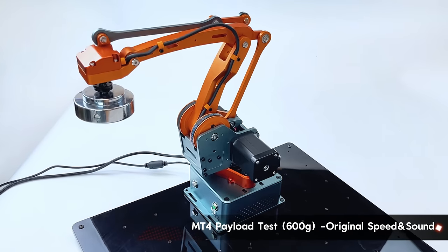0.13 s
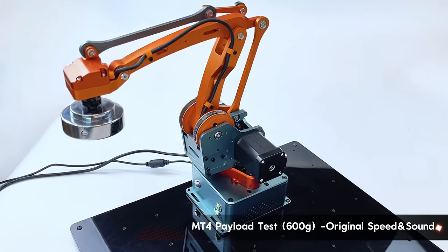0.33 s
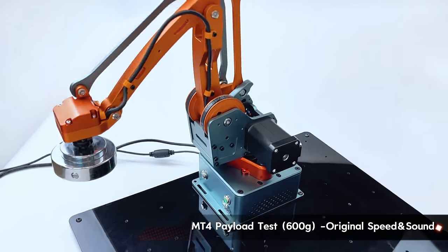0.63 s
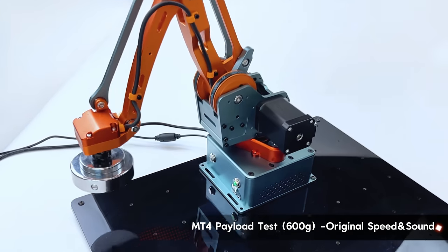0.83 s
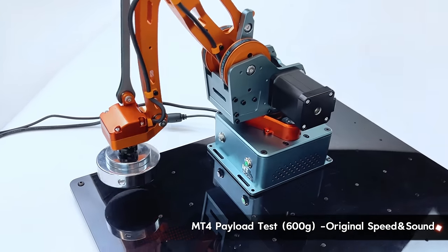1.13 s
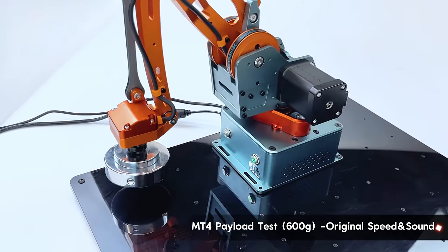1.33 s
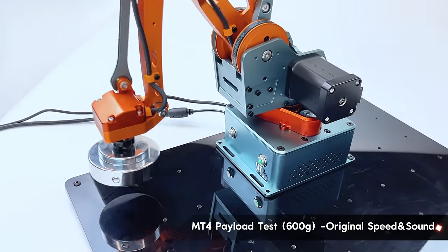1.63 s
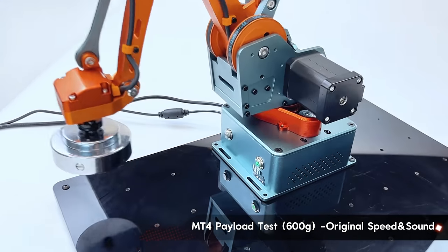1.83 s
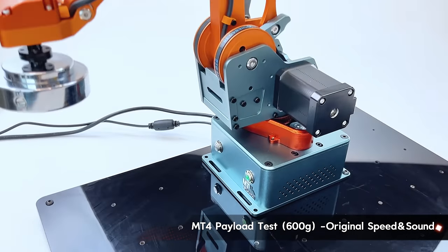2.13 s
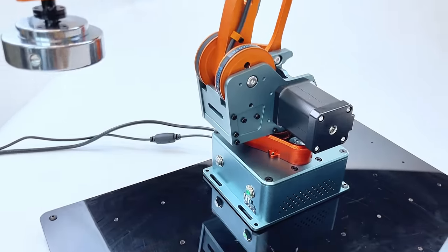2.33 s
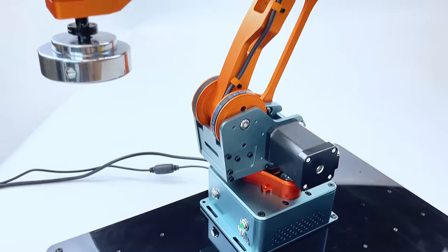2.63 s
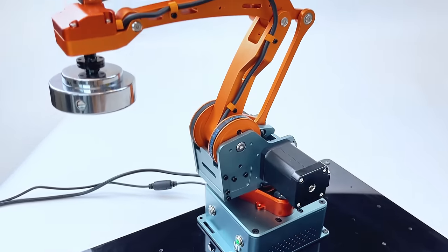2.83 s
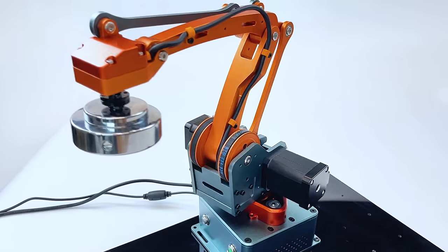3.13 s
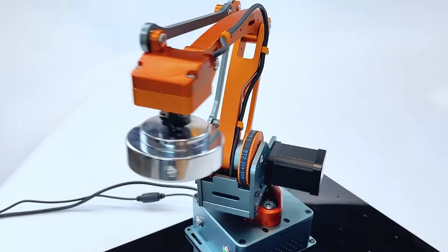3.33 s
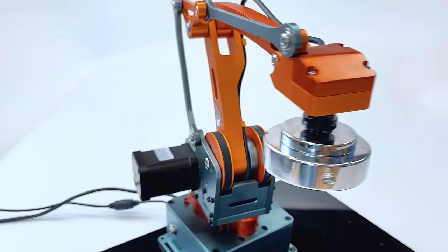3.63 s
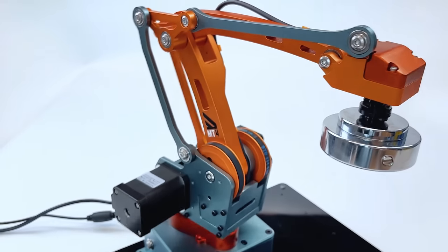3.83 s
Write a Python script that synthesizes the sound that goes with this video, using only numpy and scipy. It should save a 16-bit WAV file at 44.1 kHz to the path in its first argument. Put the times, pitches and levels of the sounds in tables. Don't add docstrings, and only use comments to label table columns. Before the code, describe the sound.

Small robotic arm motors whine up and down twice, then the base turns with a buzzing hum.

```python
import sys
import numpy as np
from scipy import signal
from scipy.fft import rfft, irfft
from scipy.io import wavfile
from scipy.ndimage import uniform_filter1d

SR = 44100
rng = np.random.default_rng(int(sys.argv[2]) if len(sys.argv) > 2 else 0)


def decibels_to_gain(level_db):
    exponent = np.asarray(level_db, float) / 20
    return 10 ** exponent


def digitize_waveform(pressure):
    field = np.atleast_2d(pressure).T
    bounded = np.clip(field, -1, 1)
    quanta = np.round(bounded * 32767).astype(np.int16)
    wavfile.write(sys.argv[1], SR, quanta)


N = 176400
T = np.arange(N) / SR
HZ = np.maximum(np.arange(N // 2 + 1) * SR / N, 1)

# (frequency [Hz], level [dB])
FAN_TONES = [(397, -59), (452, -64), (793.4, -67), (907, -70), (1190.2, -69), (1586.8, -71), (2153, -78),
             (2267, -80), (3368, -73), (3894, -80), (5026, -80)]
# (frequency [Hz], density [dB/Hz])
AIR_DENSITY = [(150, -70.5), (450, -78), (1000, -88), (1700, -83), (2100, -92.5), (3000, -94), (3450, -92),
               (4250, -92.5)]
# (frequency [Hz], likeness [0-1], right lead [rad], left-right level [dB])
AIR_PORTS = [(150, .9, .2, 0), (450, .9, .5, -1), (680, .45, .7, -1.5), (900, .4, -1, -1),
             (1550, .45, 2.7, 0), (1850, .7, 5.8, 4), (2900, .72, 5.35, 1.5), (3900, .85, 5.9, 2.5)]
# (frequency [Hz], density [dB/Hz])
HISS_DENSITY = [(3500, -116), (5300, -104), (7000, -104), (8000, -106), (10500, -112), (13000, -113),
                (15600, -118)]
# (frequency [Hz], width [Hz], level [dB])
HOUSING_MODES = [(1570, 230, 2), (1890, 600, -0.94), (2393, 410, 2.5), (2930, 180, -2.5), (3810, 190, 1.4)]
# (time [s], level [dB])
DRAUGHT_LEVEL = [(0, -39), (0.4, -40.5), (0.75, -36), (1.2, -40.5), (1.5, -33.5), (2.0, -32), (2.3, -32),
                 (2.55, -31.5), (2.65, -39.5), (2.88, -33), (3.05, -38), (3.2, -49), (3.6, -44), (3.9, -45),
                 (4.0, -53)]
# (frequency [Hz], density [dB/Hz])
DRAUGHT_COLOUR = [(20, -43), (35, -8.5), (55, 0), (90, 1.5), (140, -3.5), (250, -15), (500, -44),
                  (900, -85.5)]
# (time [s], peak level [dB], frequency [Hz])
EDDIES = [(0.12, -30.5, 90), (0.191, -29, 100), (0.402, -29, 65), (0.468, -30, 68), (0.52, -32, 54.6),
          (0.715, -30, 60), (1.38, -27.5, 101), (1.456, -20, 89), (1.52, -27, 85.6), (1.713, -22, 89),
          (1.765, -30, 121), (1.885, -27, 70), (1.96, -25.5, 55.5), (2.132, -26, 85), (2.262, -26, 70),
          (2.426, -22.5, 66), (2.512, -23.5, 65.5), (2.54, -20, 65), (2.666, -24, 95), (2.709, -28, 89),
          (2.787, -25.5, 64.4), (2.828, -21, 64.7), (2.865, -31.5, 80), (2.918, -25, 89), (3.007, -29, 75),
          (3.107, -29.5, 65), (3.555, -33.5, 124), (3.605, -35, 60), (3.87, -35, 79.5)]
# (time [s], peak level [dB], frequency [Hz])
SHUDDERS = [
    (0.96, -41.5, 293),
    (1.089, -38, 195.6),
    (1.78, -36, 180),
    (2.51, -35.5, 204),
    (2.89, -44.5, 205),
]
# (frequency at full speed [Hz], early level [dB], late level [dB])
TURN_ORDERS = [(152, -48, -55), (305, -54, -59), (414, -63, -61), (603, -67, -68), (1740, -80, -73),
               (2013, -65, -64), (2420, -72, -80)]
# (frequency [Hz], level [dB])
WHISTLES = [(2250, -69), (2510, -75), (5857, -78), (6988, -75.5)]
# (time [s], centre [Hz], level [dB])
BELT_RUSTLE = [(2.85, 15000, -82.5), (3.05, 13000, -76.5), (3.15, 11200, -72.5), (3.38, 11400, -65),
               (3.6, 11900, -69), (3.72, 12900, -64), (3.82, 13000, -67.5), (3.9, 13300, -63),
               (4.0, 13300, -68.5)]
# (time [s], level [dB], centre [Hz], width [Hz])
BELT_TICKS = [(2.943, -51, 13000, 1000), (3.137, -49, 11400, 800), (3.15, -47, 11400, 800),
              (3.153, -45, 13500, 5000), (3.19, -53, 11400, 800), (3.222, -53, 11400, 800),
              (3.268, -54, 11400, 800), (3.335, -52, 11400, 800), (3.355, -53, 11400, 800),
              (3.5, -55, 11400, 800), (3.775, -52, 13000, 1000), (3.855, -52, 13000, 1000),
              (3.925, -53, 13000, 1000)]
# (time of top speed [s], top whine [Hz], speeding up [Hz/s], slowing [Hz/s])
MOVES = [
    (0.712, 297, 445, 435),
    (2.085, 298, 430, 440),
]
# (time [s], level [dB])
SHOULDER_LEVEL = [
    [(0.29, -39), (0.35, -33), (0.45, -36), (0.53, -31), (0.59, -30.5), (0.69, -28.5), (0.755, -29.5),
     (0.8, -41), (0.9, -47)],
    [(1.85, -42), (1.98, -38), (2.045, -32), (2.125, -30.5), (2.165, -34), (2.215, -33), (2.295, -32),
     (2.43, -33.5), (2.48, -48)],
]
# (time [s], level [dB])
ELBOW_LEVEL = [
    [(0.6, -48), (0.69, -35), (0.735, -32), (0.79, -50), (0.87, -33), (0.915, -41), (0.97, -32.5),
     (1.015, -30.5), (1.05, -55)],
    [(1.79, -46), (1.855, -32), (1.905, -48), (1.95, -37), (2.02, -41), (2.085, -29), (2.125, -32),
     (2.175, -37), (2.22, -55)],
]
# (multiple [1], level [dB])
WHINE_OVERTONES = [(1, 0), (2.0, -40), (5.0, -42)]
# (frequency [Hz], level [dB])
FRAME_RESPONSE = [(186, 1), (203, -13), (222, 5), (241, -7), (254, 3), (270, -7), (290, 2)]

HISS_LAG_S, HISS_IN_STEP_HZ = .000143, 4850
HISS_LEAD_RAD = 2 * np.pi * HISS_LAG_S * (HZ - HISS_IN_STEP_HZ)
GEAR_GRAIN_DB = 3.0


def rms_one(x):
    return x / np.sqrt(np.mean(x ** 2) + 1e-20)


def along(rows, x, log=False):
    first, *columns = np.transpose(rows)
    if log:
        x, first = np.log(x), np.log(first)
    return [np.interp(x, first, column) for column in columns]


def drift(rate_hz):
    pole = np.exp(-80 * np.pi * rate_hz / SR)
    noise = rng.standard_normal(N // 40 + 2002)
    slow = signal.lfilter([1], [1, -2 * pole, pole * pole], noise)[2000:]
    return np.interp(np.arange(N) / 40, np.arange(len(slow)), rms_one(slow))


def port_noise(density_db, alike, lead_rad, pan_db=0):
    shared, own = rfft(rng.standard_normal((2, N))) * decibels_to_gain(density_db) * np.sqrt(SR / 2)
    alike = np.clip(alike, 0, 1)
    right = (alike * shared + np.sqrt(1 - alike ** 2) * own) * np.exp(1j * lead_rad)
    return irfft(np.array([shared * decibels_to_gain(pan_db / 2), right * decibels_to_gain(-pan_db / 2)]), N)


def tone(hz, lag_s):
    phase = 2 * np.pi * (np.cumsum(hz * np.ones(N)) / SR + rng.random())
    return np.sqrt(2) * np.sin([phase - 2 * np.pi * hz * lag_s, phase])


def singing(tones, waver_db, wander):
    out = 0
    for hz, db in tones:
        gain = decibels_to_gain(db + waver_db * drift(5.4))
        pitch_hz = hz * (1 + wander * drift(3.3))
        lag_s = HISS_LAG_S * np.maximum(1 - HISS_IN_STEP_HZ / hz, 0)
        out = out + gain * tone(pitch_hz, lag_s)
    return out


def ripple():
    knots_db = 1.0 * rng.standard_normal(800)
    return np.interp(HZ / 22, np.arange(len(knots_db)), knots_db)


def housing(air):
    spectrum = rfft(air)
    for hz, width_hz, db in HOUSING_MODES:
        part = irfft(spectrum * np.exp(-((HZ - hz) / width_hz) ** 2), N)
        air = air + part * (decibels_to_gain(db + .9 * drift(5)) - 1)
    return air


def fan():
    fade_db = -10.5 * np.clip((T - 2.28) / 0.21, 0, 1)
    tones = singing(FAN_TONES, waver_db=3.5, wander=0.0011) * decibels_to_gain(fade_db)

    air_db, = along(AIR_DENSITY, HZ, log=True)
    above_oct = np.maximum(np.log2(HZ / AIR_DENSITY[-1][0]), 0)
    below_oct = np.maximum(np.log2(AIR_DENSITY[0][0] / HZ), 0)
    air_db = air_db + ripple() - 34 * above_oct - 12 * below_oct
    air = port_noise(air_db, *along(AIR_PORTS, HZ, log=True)) * decibels_to_gain(.3 * drift(3))
    low = signal.sosfilt(signal.butter(2, 600, fs=SR, output="sos"), air)
    air = air + low * (decibels_to_gain(-1.7 * (T - 3.0)) - 1)

    hiss_db, = along(HISS_DENSITY, HZ, log=True)
    hiss = port_noise(hiss_db + .5 * ripple(), .94, HISS_LEAD_RAD)
    return tones + housing(air) + hiss


def draught():
    lull_db, eddy_db, rise_s, fall_s, sag = -0.5, -1.5, .012, .013, .25
    colour_db, = along(DRAUGHT_COLOUR, HZ, log=True)
    port_lumps = np.array([drift(7.7), drift(4.1)])
    lumps = decibels_to_gain(1.3 * (drift(19.6) + .5 * port_lumps))
    level_db, = along(DRAUGHT_LEVEL, T)
    out = rms_one(port_noise(colour_db, .7, 0) * lumps) * decibels_to_gain(level_db + lull_db)
    for (s, db, hz), (start, pan) in zip(EDDIES, rng.random((len(EDDIES), 2))):
        t = T - s - rise_s
        shape = np.exp(-(t * min(hz / 75, 1) / np.where(t < 0, rise_s, fall_s)) ** 2)
        cycles = start + hz * t * (1 - sag * np.tanh(t / 0.039))
        pan_gain = decibels_to_gain([[3 * (pan - .5)], [3 * (.5 - pan)]])
        out = out + decibels_to_gain(db + eddy_db) * shape * np.sin(2 * np.pi * cycles) * pan_gain
    return out


def shudders():
    out = 0
    for s, db, hz in SHUDDERS:
        out = out + decibels_to_gain(db) * np.exp(-((T - s) / 0.025) ** 2) * np.sin(2 * np.pi * hz * T)
    return out


def base_motor():
    run_up = np.clip((T - 3.17) / .18, 0, 1)
    late = np.clip((T - 3.5) / 0.34, 0, 1)
    speed = .7 + .3 * run_up
    orders = [(hz * speed, early_db + (late_db - early_db) * late) for hz, early_db, late_db in TURN_ORDERS]
    motor = singing(orders, waver_db=2.0, wander=.002)
    motor = motor * np.sqrt(run_up) * decibels_to_gain(GEAR_GRAIN_DB * drift(35) - 1)
    whistles = singing(WHISTLES, waver_db=2.5, wander=.0006)
    whistles = whistles * np.clip((T - 3.4) / .15, 0, 1) * decibels_to_gain(GEAR_GRAIN_DB * drift(25) - 1)
    return motor + whistles


def belt():
    centre_hz, level_db = along(BELT_RUSTLE, T)
    out = 0
    for hz in np.arange(7000, 17000, 1000):
        band = port_noise(-30 * ((HZ - hz) / 1500) ** 2, .95, HISS_LEAD_RAD)
        share_db = np.maximum(-10 * ((centre_hz - hz) / 1900) ** 2, -10)
        gain = decibels_to_gain(level_db - 10.5 + share_db + 2 * drift(30))
        out = out + rms_one(band) * gain * (T > BELT_RUSTLE[0][0])
    colours = {}
    for s, db, hz, width_hz in BELT_TICKS:
        if (hz, width_hz) not in colours:
            noise = port_noise(-10 * ((HZ - hz) / width_hz) ** 2, .8, HISS_LEAD_RAD)
            colours[hz, width_hz] = rms_one(noise)
        out = out + colours[hz, width_hz] * decibels_to_gain(db - 16) * np.exp(-((T - s) / .003) ** 2)
    return out


def whine_hz(move, late_s):
    top_s, top_hz, up, down = move
    t = T - top_s - late_s
    loss_hz = np.where(t < 0, up, down) * t
    return np.maximum(top_hz + 13 - np.hypot(loss_hz, 13), 1)


def joint_whine(hz, ratio, level_db, rows):
    tail_db = 25 * np.maximum(T - rows[-1][0], 0)
    onset_db = 200 * np.maximum(rows[0][0] - T, 0)
    db = level_db - tail_db - onset_db - 90 * (hz < 80)
    gain = uniform_filter1d(decibels_to_gain(db + 1.2 * drift(22)), size=300)
    return gain * sum(decibels_to_gain(d) * tone(hz * ratio * k, .00025) for k, d in WHINE_OVERTONES)


def joints():
    elbow_ratio, elbow_late_s, pan_db = .715, .018, .6
    out = 0
    for move, shoulder, elbow, fourth_db in zip(MOVES, SHOULDER_LEVEL, ELBOW_LEVEL, (-70, -62)):
        shoulder_hz = whine_hz(move, 0)
        shoulder_db = along(shoulder, T)[0] + along(FRAME_RESPONSE, shoulder_hz)[0]
        out = out + joint_whine(shoulder_hz, 1, shoulder_db, shoulder)
        elbow_hz = whine_hz(move, elbow_late_s)
        out = out + joint_whine(elbow_hz, elbow_ratio, along(elbow, T)[0], elbow)
        panel = np.exp(-((4 * elbow_hz - 1075) / 90) ** 2)
        out = out + decibels_to_gain(fourth_db + 1.5 * drift(25)) * panel * tone(4 * elbow_hz, 0)
    return out * decibels_to_gain([[pan_db / 2], [-pan_db / 2]])


def scene():
    return fan() + draught() + shudders() + base_motor() + belt() + joints()


def top_cut(x):
    return signal.sosfilt(signal.butter(12, 15580, fs=SR, output="sos"), x)


def record(dry):
    mix = dry * np.clip(T / 0.0013, 0, 1)
    return top_cut(mix)


dry = scene()
out = record(dry)
digitize_waveform(out)
```